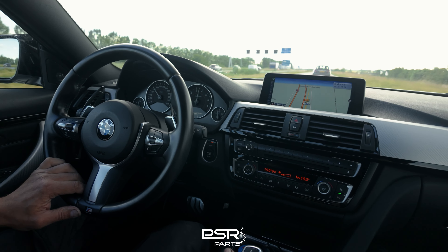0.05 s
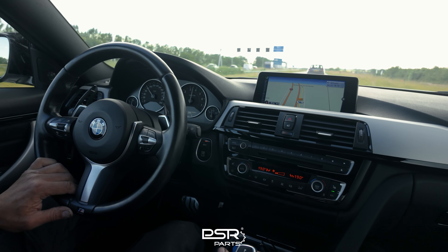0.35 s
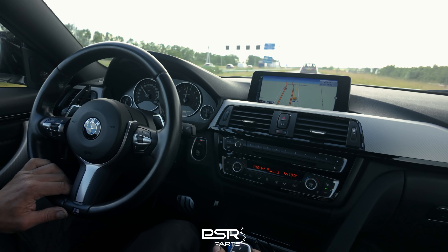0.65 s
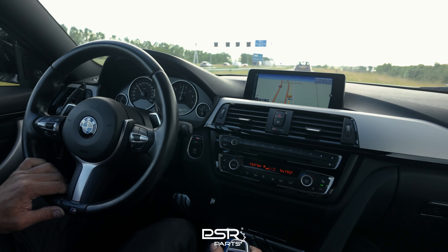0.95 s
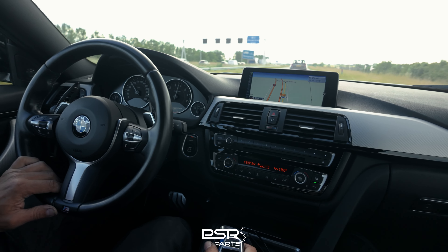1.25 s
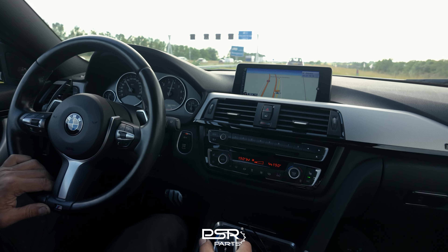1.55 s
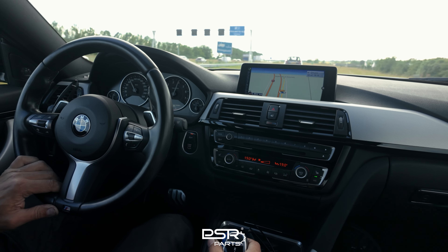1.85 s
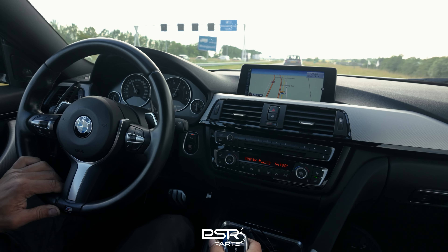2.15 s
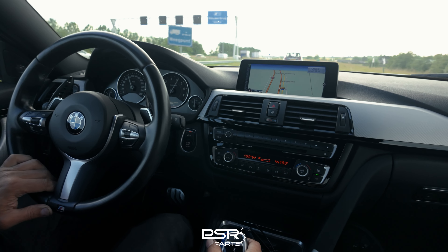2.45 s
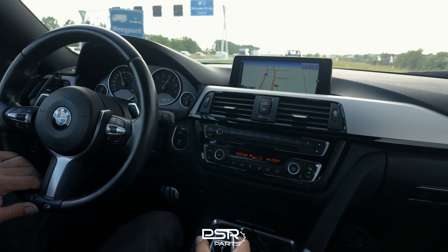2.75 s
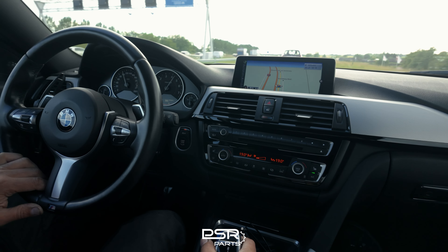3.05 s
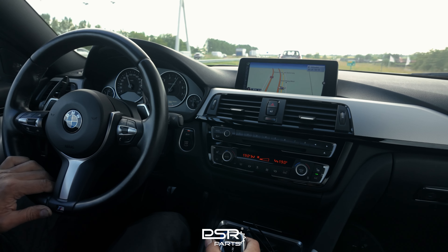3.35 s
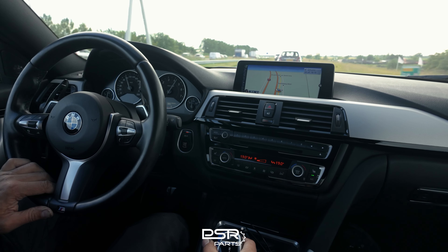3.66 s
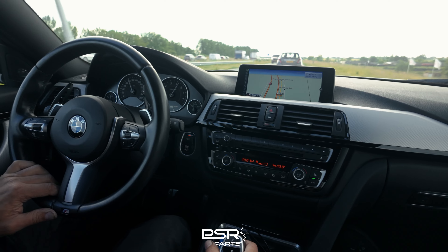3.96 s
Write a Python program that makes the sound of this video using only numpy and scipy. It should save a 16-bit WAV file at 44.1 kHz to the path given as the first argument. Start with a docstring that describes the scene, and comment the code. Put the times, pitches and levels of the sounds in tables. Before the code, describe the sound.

Heard between the front seats, a turbocharged car engine booms and climbs gently above low road rumble. Past halfway it eases off with a brief hiss of air, leaving a softer drone, a faint falling whine and dull bumps.

```python
"""Inside a turbocharged six-cylinder car at speed, over a steady rumble of tyres. First the engine pulls,
its firing harmonics booming in the cabin, while the turbo whistles upward. At about 2.3 s the driver
lifts and the boost blows off with a hiss. Then the turbo winds down and the engine drones, while road
joints thud through the body and the trim ticks."""
import sys
import numpy as np
from scipy import signal
from scipy.fft import rfft, irfft
from scipy.io import wavfile

SR = 44100
rng = np.random.default_rng(int(sys.argv[2]) if len(sys.argv) > 2 else 0)


def wrap_up_sound(samples):
    """Save the sound to the file named by the first command line argument, as 16-bit audio."""
    columns = np.atleast_2d(samples).T
    # keep every value between -1 and 1, then stretch to whole-number steps
    tamed = np.clip(columns, -1, 1)
    steps = np.round(tamed * 32767).astype(np.int16)
    wavfile.write(sys.argv[1], SR, steps)


N = 176400
TIME, HZ = np.arange(N) / SR, np.fft.rfftfreq(N, 1 / SR)

# Noise spectra. Each row: frequency in Hz, relative spectral density in dB.
RUMBLE_SPECTRUM = [(15, -28.5), (31, -34), (42, -17), (52, -5), (68, 2.5), (100, -3), (122, 4), (145, -2),
                   (168, -8), (195, -5.5), (215, -4), (240, -12.5), (320, -12), (400, -25), (700, -38.5),
                   (2000, -93.5)]
TYRE_SPECTRUM = [(100, -13), (300, -6.5), (420, -1.5), (540, -0.5), (650, -4), (820, 0), (950, -1),
                 (1100, -7), (1220, -9), (1400, -12), (1600, -13.5), (2000, -17.5), (2800, -26.5),
                 (4000, -32.5), (5600, -44.5), (7000, -50), (10000, -55.5), (15500, -56.5)]
SLAP_SPECTRUM = [(150, -10.5), (300, -3.5), (540, -3), (700, -7.5), (1200, -16.5), (2500, -37), (8000, -67)]
TRIM_SPECTRUM = [(1500, -6.5), (4000, 4.5), (5500, 4.5), (6500, -2), (7400, 2.5), (8000, -5.5), (10000, -5),
                 (12000, -12), (16000, -25)]
ROAR_SPECTRUM = [(150, -21), (300, -9.5), (500, -5), (750, -4.5), (1200, 1), (1650, -10), (2200, -19),
                 (4000, -31.5), (6000, -40), (9000, -49), (16000, -65)]
AIR_SPECTRUM = [(800, -22.5), (2000, 0.5), (3000, 2.5), (4200, 4), (5600, -3.5), (6800, -15.5), (9000, -15),
                (11000, -19), (12200, -26.5), (16000, -37)]
# Envelopes. Each row: time in seconds, relative level in dB.
RUMBLE_ENVELOPE = [(0, 0), (.5, -1.5), (.8, 0), (1.4, 0), (1.8, 2.5), (2.25, 2), (2.52, 3.5), (2.68, 0.5),
                   (3, 2.5), (3.35, 0.5), (4, 0.5)]
TYRE_ENVELOPE = [(0, -4), (.8, -3), (2, 0.5), (2.6, 2.5), (3.2, 2), (3.45, 1), (4, 1.5)]
ENGINE_LOAD = [(0, -8), (.4, -4.5), (.62, -1.5), (.73, -4.5), (.88, -2.5), (.98, 2), (1.3, 2.5), (1.8, 2.5),
               (1.95, 2.5), (2.27, 3.5), (2.42, -2), (2.65, -9.5), (4, -15.5)]
ROAR_ENVELOPE = [(0, -10.5), (.85, -13.5), (1.05, -4), (1.5, -7), (1.85, -6), (2.1, 0.5), (2.4, 4),
                 (2.6, -4), (2.8, -7.5), (4, -11.5)]
AIR_ENVELOPE = [(0, -43), (.85, -23), (1.04, -11.5), (1.3, -16.5), (1.9, -12.5), (2.36, -11.5),
                (2.395, 1.5), (2.58, 0.5), (2.68, -4.5), (2.9, -10), (3.3, -12.5), (4, -20)]
WHISTLE_ENVELOPE = [(.65, -102), (.9, -87), (1.05, -81), (1.25, -86), (1.5, -81), (1.85, -82), (2.05, -78),
                    (2.25, -74), (2.36, -81), (2.4, -66), (2.53, -66), (2.62, -68), (2.68, -86), (2.9, -76),
                    (3.1, -83), (3.5, -77), (3.7, -71), (3.735, -60), (3.78, -77), (4, -82)]
# Resonances of tyre tread and air columns, and of the charge pipes.
# Each row: centre in Hz, width in Hz, gain in dB.
TYRE_MODES = [(470, 50, 4.5), (558, 31, 2), (929, 64, 3.5), (1203, 26, 4.5), (1580, 50, 4.5)]
PIPE_MODES = [(2730, 50, 6), (3000, 48, 9.5), (3410, 55, 5.5), (3674, 62, 9.5), (3980, 50, 6),
              (4280, 38, 3), (4540, 29, 10), (5700, 140, 6.5), (6250, 92, 7), (7460, 120, 4),
              (8440, 60, 7.5)]
# Likeness of the noise on the two sides. Each row: frequency in Hz, correlation.
COHERENCE = [(30, 1), (130, 0.98), (260, 1), (500, 0.79), (1000, 0.83), (2000, 0.39), (4000, 0),
             (8000, 0.029), (14000, 0.78)]
# Road joints. Each row: start in seconds, body level in dB, body pitch in Hz, boom in dB, slap in dB.
JOINTS = [(2.072, -17, 123, -42, -50), (2.472, -15, 107.6, -25.5, -56), (2.725, -16, 122.4, -30.5, -49),
          (2.93, -20, 83.6, -36, -37), (3.166, -16.5, 129.3, -20.5, -36.5), (3.245, -28, 124, -26, -36),
          (3.381, -21.5, 126, -27.5, -50), (3.481, -22.5, 119.7, -27, -50.5),
          (3.71, -20.5, 124.6, -22.5, -49)]
# Trim ticks. Each row: start in seconds, relative level in dB.
TRIM_TICKS = [(1.493, -48), (1.784, -57), (2.746, -45), (2.775, -55), (2.946, -58), (3.188, -61)]
# Engine speed. Each row: time in seconds, firing rate in Hz.
FIRING_RATE = [(0, 170), (.5, 174.2), (.8, 177), (1.1, 183.3), (1.4, 189.6), (1.75, 198.9), (2, 205.3),
               (2.25, 212.4), (2.42, 216.5), (3, 213.5), (4, 207.5)]
# Cabin response to the firing harmonics, and to the lines that uneven firing puts between them.
# Each row: frequency in Hz, relative level in dB.
BOOM_RESPONSE = [(168, -21), (184, -19.7), (197, -21.5), (207, -17.5), (218, -20.5), (340, -32),
                 (396, -31.5), (412, -46), (432, -42), (520, -41), (552, -39.5), (590, -47), (616, -37),
                 (655, -38), (695, -51), (730, -39), (760, -41), (785, -51), (820, -43), (850, -38),
                 (875, -39), (910, -52), (1200, -50), (2000, -70)]
UNEVEN_RESPONSE = [(28, -60.5), (66, -38), (135, -34), (175, -31), (240, -41.5), (265, -47.5), (285, -36.5),
                   (330, -43), (385, -41.5), (430, -49), (490, -44.5), (565, -45.5), (600, -48),
                   (675, -44.5), (790, -53.5), (870, -48.5), (1060, -53), (1200, -54), (1400, -63.5),
                   (1650, -60), (2000, -71)]
# Cylinder imbalance. Each entry: offset in dB for one of the five lines above a firing harmonic.
IMBALANCE = [-2, 0, 1, 0.5, -3]
# Balance of the firing harmonics. Each row: frequency in Hz, leftward gain in dB.
BOOM_BALANCE = [(168, -1.9), (182, -1.8), (200, 0.5), (400, -0.5)]
# Drone with the throttle shut. Each row: multiple of the firing rate, level in dB.
OVERRUN_HARMONICS = [(1, -29.5), (2, -43), (3, -53.5)]
# Turbo whistle. Each row: time in seconds, pitch in Hz.
WHISTLE_PITCH = [(.7, 6900), (.9, 8850), (1.03, 9600), (1.12, 9050), (1.24, 8900), (1.5, 9880),
                 (1.8, 10900), (2.02, 11480), (2.3, 11720), (2.41, 11560), (2.46, 11150), (2.52, 10560),
                 (2.63, 9600), (2.86, 7650), (3.04, 7100), (3.3, 5850), (3.52, 4980), (3.73, 4490),
                 (4, 4050)]
# Fuzzy band around the whistle. Each row: time in seconds, level in dB relative to the tone.
WHISTLE_FUZZ = [(.9, -9.5), (1.05, 8.5), (1.3, -5), (2.3, -6.5), (2.55, -8.5), (2.9, 9.5), (3.25, 2),
                (3.7, -12)]

CYLINDERS, ENGINE_WAVER_HZ = 6, 4.5


def amp(db):
    """Amplitude ratio for a level in decibels."""
    return 10 ** (np.asarray(db) / 20)


def unit(x):
    """Normalisation to an rms of 1."""
    return x / np.sqrt(np.mean(abs(x) ** 2) + 1e-20)


def curve(points):
    """Linear interpolation over time."""
    return np.interp(TIME, *np.transpose(points))


def read(points, hz):
    """Interpolation on a log-frequency axis."""
    f, value = np.transpose(points)
    return np.interp(np.log(hz + 1), np.log(f + 1), value)


def pan(db):
    """Level difference: the left gains db, the right loses it."""
    return amp([[db], [-db]])


def waver(rate_hz):
    """Random modulation: low-passed complex noise of rms 1."""
    steps = np.arange(0, N, 32)
    white = rng.standard_normal((len(steps), 2)) @ [1, 1j]
    hz = np.fft.fftfreq(len(steps), steps[1] / SR)
    slow = np.fft.ifft(np.fft.fft(white) / (1 + (hz / rate_hz) ** 2))
    return np.interp(np.arange(N), steps, unit(slow))


def resonances(modes):
    """Resonance: each mode raises a bell-shaped peak in the spectrum."""
    return amp(sum(db / (1 + (2 * (HZ - hz) / width) ** 2) for hz, width, db in modes))


def ripple(depth_db, width_hz=45, top_hz=7000):
    """Interference: cabin reflections leave fine peaks and dips in a spectrum."""
    window = np.hanning(int(2 * width_hz / HZ[1]) + 3)
    bumpy = signal.fftconvolve(rng.standard_normal(len(HZ)), window, "same")
    return amp(depth_db * unit(bumpy) / (1 + (HZ / top_hz) ** 2))


def noise(spectrum, colour=1):
    """Partial coherence: coloured stereo noise of rms 1, nearly mono in the bass."""
    mid, side = rfft(rng.standard_normal((2, N))) * amp(read(spectrum, HZ)) * colour
    same = np.clip(read(COHERENCE, HZ), -1, 1)
    mid, side = mid * np.sqrt(1 + same), side * np.sqrt(1 - same)
    return unit(irfft(np.array([mid + side, mid - side]), N))


def cabin(x, fade_s=.008, echo_db=-4.5):
    """Early reflections off the glass join the direct sound, differently on each side."""
    t = np.arange(2048) / SR
    taps = rng.standard_normal((2, len(t))) * np.exp(-t / fade_s)
    taps *= amp(echo_db) / np.linalg.norm(taps, axis=1, keepdims=True)
    return (x + signal.oaconvolve(x[None], taps, axes=1)[:, :N]) / np.hypot(1, amp(echo_db))


def road():
    """Broadband excitation: the body rumbles under the wash of tyres and wind."""
    rumble = noise(RUMBLE_SPECTRUM) * amp(-24 + curve(RUMBLE_ENVELOPE))
    wash = noise(TYRE_SPECTRUM, resonances(TYRE_MODES) * ripple(depth_db=1.4))
    return rumble + wash * amp(-37.5 + curve(TYRE_ENVELOPE))


def trim(rise_s=.002, fade_s=.0081, tail_s=.03):
    """Damped transients: plastic trim ticks in noise bursts with a fast decay and a faint tail."""
    envelope = np.zeros(N)
    for start, db in TRIM_TICKS:
        t = np.maximum(TIME - start, 0)
        decay = np.exp(-t / fade_s) + amp(-10) * np.exp(-t / tail_s)
        envelope += amp(db) * np.minimum(t / rise_s, 1) * decay
    return pan(-1.5) * amp(-6.5) * envelope * noise(TRIM_SPECTRUM)


def road_joints(rise_s=.019, cabin_hz=215):
    """Impact excitation: each joint slaps the tyres and sets body and cabin ringing for a few cycles."""
    out, slap = np.zeros((2, N)), noise(SLAP_SPECTRUM)
    for start, body_db, body_hz, boom_db, slap_db in JOINTS:
        t = np.maximum(TIME - start, 0)
        body = amp(body_db) * np.sin(2 * np.pi * body_hz * t)
        boom = amp(boom_db) * np.sin(2 * np.pi * cabin_hz * t)
        envelope = (t / rise_s * np.exp(1 - t / rise_s)) ** 2
        out += envelope * (body + boom + amp(slap_db) * slap)
    return out


def overrun(lift_s=2.33, fade_in_s=.18):
    """Forced vibration: after the lift the wheels turn the engine, which drones unsteadily."""
    angle = 2 * np.pi * np.cumsum(curve(FIRING_RATE)) / SR
    drone = sum(amp(db) * ((1 + .39 * waver(ENGINE_WAVER_HZ)) * np.exp(1j * k * angle)).real
                for k, db in OVERRUN_HARMONICS)
    return drone * np.clip((TIME - lift_s) / fade_in_s, 0, 1)


def engine(spread_hz=950, pulse_depth=.39):
    """Periodic firing gives harmonics of the engine cycle and modulates the combustion and intake roar."""
    cycle_hz = curve(FIRING_RATE) / CYLINDERS
    angle = 2 * np.pi * np.cumsum(cycle_hz) / SR
    tones = np.zeros((2, N))
    for k in range(2, 56):
        hz = k * cycle_hz
        if k % CYLINDERS == 0:  # firing harmonics: strong and steadier
            db, unsteady = read(BOOM_RESPONSE, hz), .14 * np.sqrt(k / CYLINDERS)
            lean = amp(read(BOOM_BALANCE, hz))
        else:
            db = read(UNEVEN_RESPONSE, hz) + IMBALANCE[k % CYLINDERS - 1]
            unsteady, lean = .61, 1
        strength = amp(db) * (1 + unsteady * waver(ENGINE_WAVER_HZ))
        line = strength * np.exp(1j * (k * angle + 2 * np.pi * rng.random()))
        # The two sides differ in phase, by up to a radian for high lines.
        apart = np.exp(1j * rng.choice([-1, 1]) * min(hz.mean() / spread_hz, 1) / 2)
        tones += [(line * apart * lean).real, (line / apart / lean).real]
    pulses = 1 + pulse_depth * np.cos(CYLINDERS * angle)
    roar = unit(noise(ROAR_SPECTRUM, ripple(depth_db=2)) * pulses)
    return tones * amp(curve(ENGINE_LOAD)) + roar * amp(-40.5 + curve(ROAR_ENVELOPE))


def turbo():
    """A modulated tone follows the rotor; flow noise excites the pipes on boost and bursts on the lift."""
    spin = np.exp(2j * np.pi * np.cumsum(curve(WHISTLE_PITCH)) / SR)
    fuzz = amp(curve(WHISTLE_FUZZ))
    flutter = unit(1 + .6 * waver(rate_hz=35))
    modulation = (flutter + fuzz * waver(rate_hz=300)) / np.hypot(1, fuzz)
    whistle = cabin((spin * modulation).real * amp(curve(WHISTLE_ENVELOPE)))
    hiss = noise(AIR_SPECTRUM, resonances(PIPE_MODES)) * amp(-48.5 + curve(AIR_ENVELOPE))
    return pan(-.7) * (whistle + hiss)


def scene():
    """Superposition of all sources between the front seats."""
    return engine() + overrun() + road() + road_joints() + turbo() + trim()


def record(dry):
    """Band limiting: a steep low-pass removes the highest treble."""
    lowpass = signal.firwin(511, 15750, window=("kaiser", 9), fs=SR)
    return signal.oaconvolve(dry, lowpass[None], "same")


dry = scene()
out = record(dry)
wrap_up_sound(out)
```